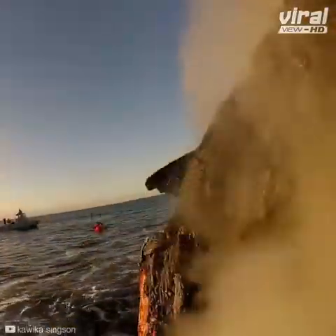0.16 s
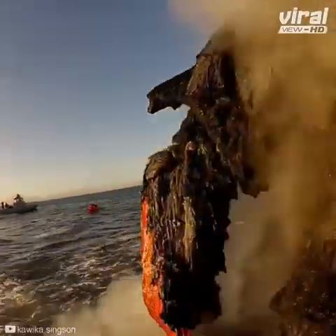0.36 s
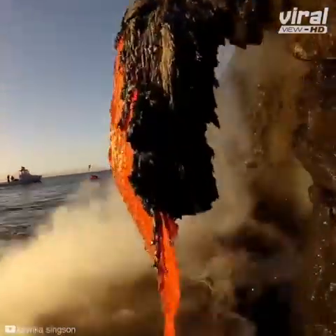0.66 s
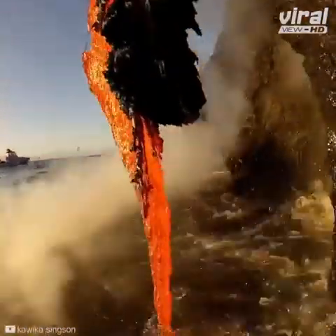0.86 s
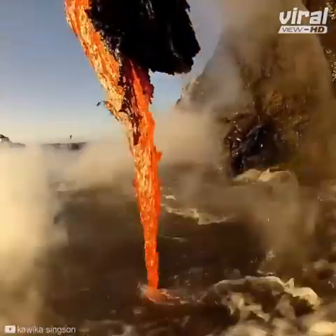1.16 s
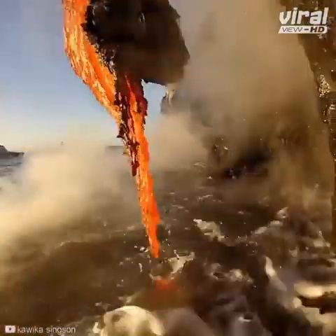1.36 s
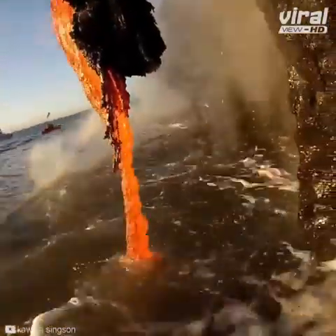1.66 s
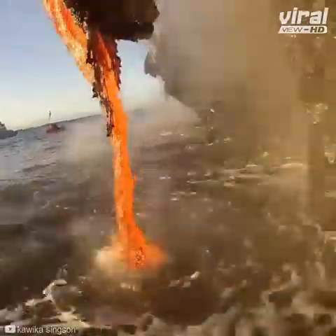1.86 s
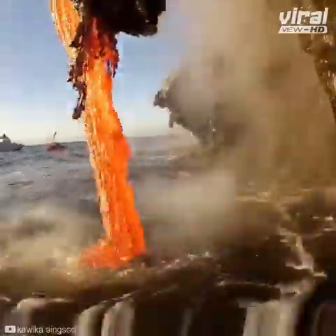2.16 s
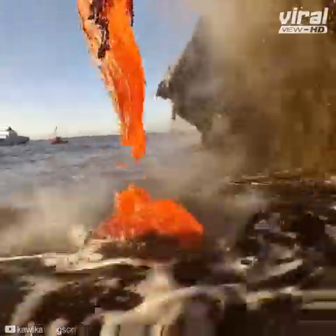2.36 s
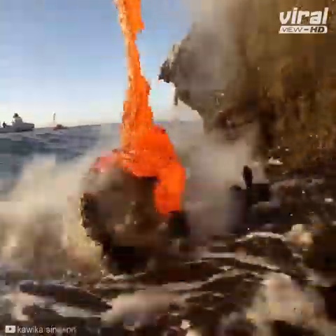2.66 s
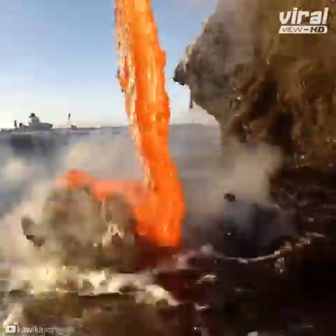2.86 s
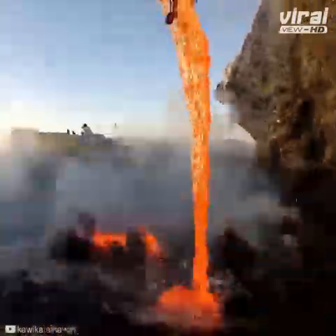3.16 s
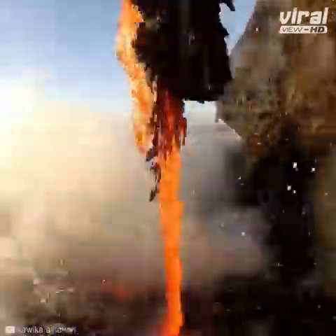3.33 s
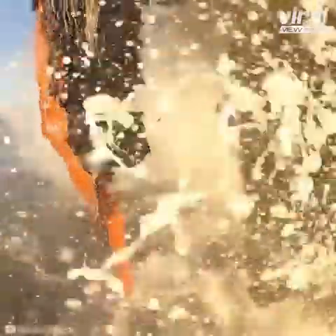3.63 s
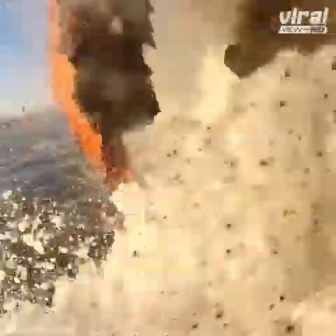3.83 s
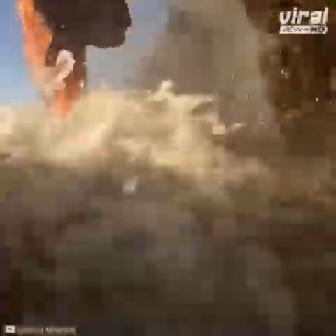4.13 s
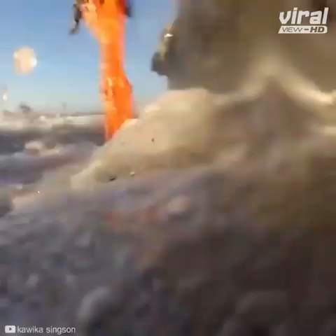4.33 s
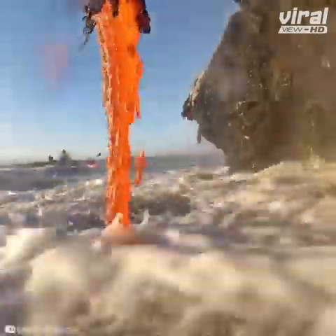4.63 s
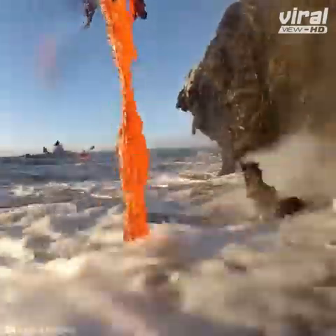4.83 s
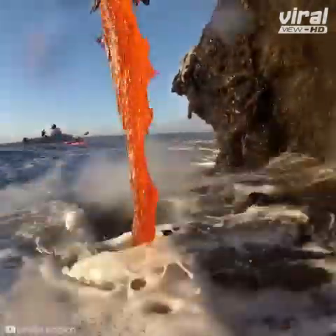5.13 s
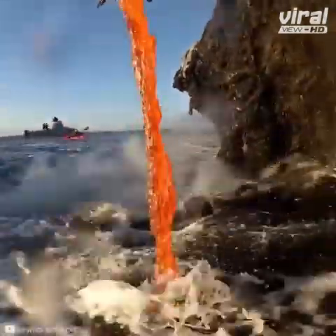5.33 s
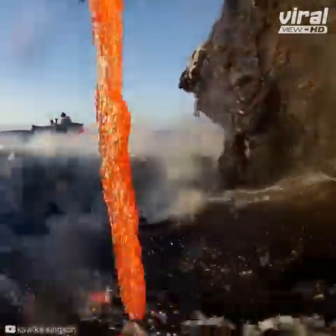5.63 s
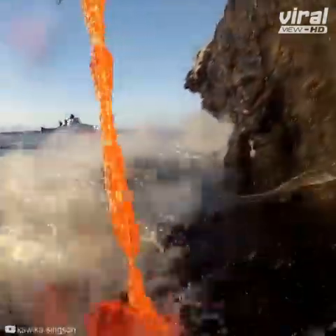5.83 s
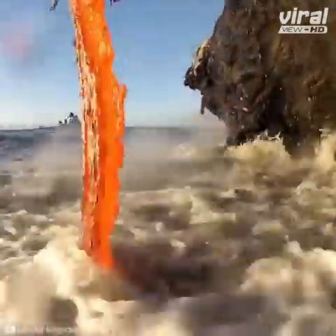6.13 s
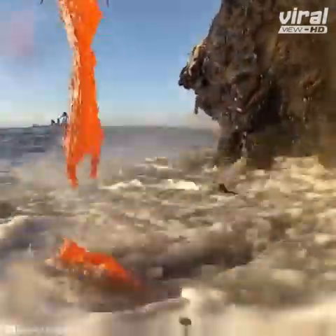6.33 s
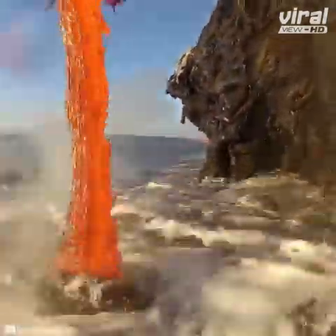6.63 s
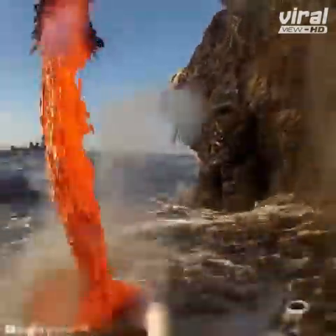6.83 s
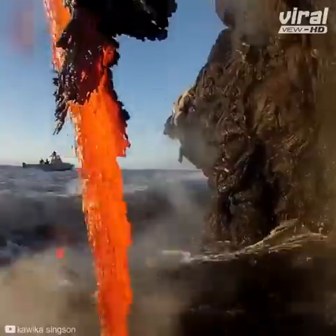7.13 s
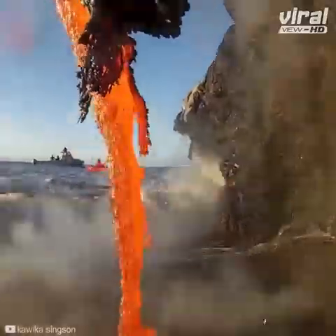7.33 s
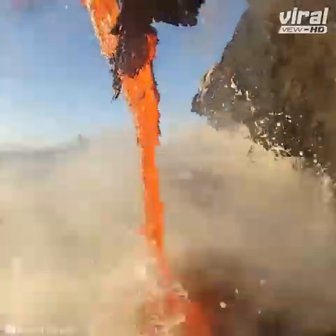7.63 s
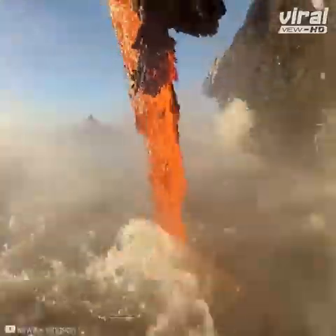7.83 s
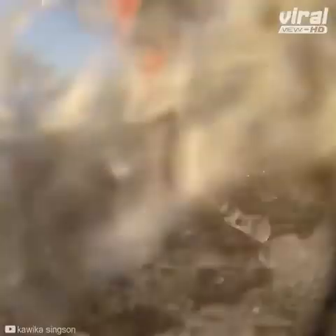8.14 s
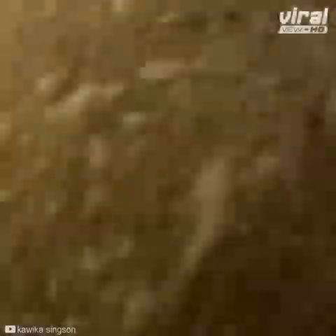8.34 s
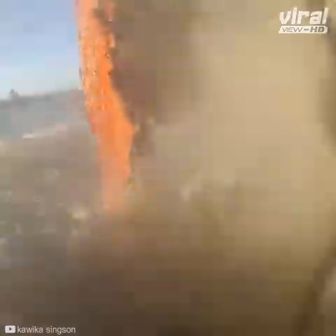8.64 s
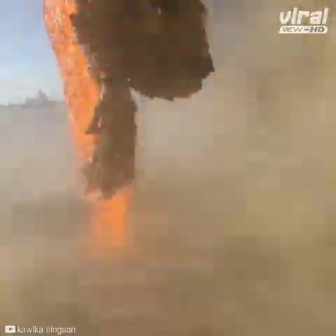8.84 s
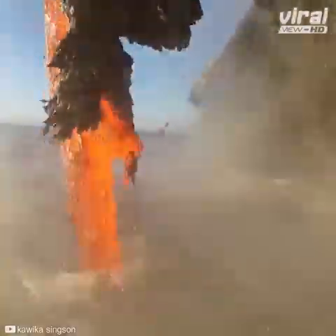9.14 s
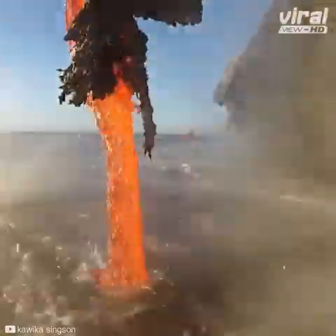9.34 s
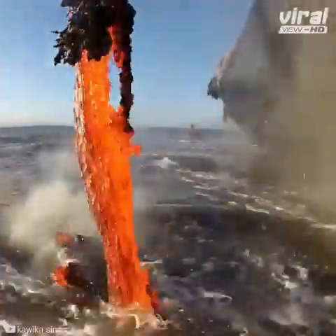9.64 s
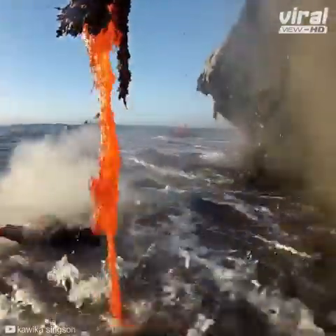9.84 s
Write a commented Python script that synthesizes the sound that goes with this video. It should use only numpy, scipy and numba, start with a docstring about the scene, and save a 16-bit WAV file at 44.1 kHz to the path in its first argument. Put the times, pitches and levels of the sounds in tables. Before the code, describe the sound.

Outdoors in surf beside pouring lava, heard by one close microphone sealed in a plastic shell on a pole, identical in both channels. A faint, dull hiss of surf and steam with fine foam crackle lies over a low, lumpy water rumble. Soft thumps come at 0.2 s, then hollow knocks, cracks and splashes at 1.0 to 1.4 s. From 1.5 to 3.5 s it is mostly quiet hiss, with a light tick near 2. At 3.6 s the hiss surges and spray snaps on the shell until 4.2; around 4.5 to 4.7 a wave swamps it with a short, dull drone. Deep thuds follow at 5.0, then at 6.2. Blows and splashes crowd 6.5 to 7.0 and 7.7 to 7.9. The loudest cracks come at 8.3 to 8.7, with bubbling, droning water and pole shudder, then hiss swells again, with a faint thump near 9.35.

```python
"""Surf and steam hiss where lava pours into the sea, heard dully through a camera's sealed shell on a pole.
The hiss is shaped noise with foam clicks in it, and low noise makes the rumble of water heaving on the pole.
Splashes and cracks are random droplets and short bursts that ring the shell; fading low tones are blows
of water on housing and pole. Twice a wave buries the camera: droning noise, bubbles and a shaken pole.
One microphone, so both channels are alike."""
import sys
import numpy as np
from scipy import signal
from scipy.fft import rfft, irfft
from scipy.io import wavfile
from scipy.ndimage import uniform_filter1d
from numba import njit

SR = 44100
rng = np.random.default_rng(int(sys.argv[2]) if len(sys.argv) > 2 else 0)


def bounce(signal):
    """Save signal as a 16-bit WAV file at the path given by the first command-line argument."""
    frames = np.transpose(np.atleast_2d(signal))
    limited = np.clip(frames, -1, 1)
    pcm = np.round(limited * 32767).astype(np.int16)
    wavfile.write(sys.argv[1], SR, pcm)


N = 440559  # length of the sound [samples]


def gain_of(db):
    """Turns decibels into a factor for the wave's height."""
    return 10 ** (np.asarray(db) / 20)


def evened(x):
    """Scales a sound to an average strength (rms) of 1."""
    return x / np.sqrt(np.mean(x ** 2) + 1e-20)


def read_curve(points, hz):
    """Reads a curve of (frequency, value) points, with pitch spaced as we hear it."""
    point_hz, value = np.transpose(points)
    return np.interp(np.log(hz + 1), np.log(point_hz + 1), value)


def add(mix, s, sound):
    """Adds a sound to the mix from time s on, cut off at the end of the mix."""
    part = mix[round(s * SR):][:len(sound)]
    part += sound[:len(part)]


def columns(rows):
    """Draws straight lines between timed rows: each column's value at every sample of their span."""
    s, *values = np.transpose(rows)
    t = np.arange(s[0], s[-1], 1 / SR)
    return [np.interp(t, s, v) for v in values]


@njit
def smooth(x, r):
    """Softens quick changes (a one-pole low-pass); r, the memory of the last value, may move."""
    y = x * (1 - r)
    for n in range(1, len(x)):
        y[n] += r[n] * y[n - 1]
    return y


def resonate(x, hz, width):
    """A resonance of gain 1: shifts the pitch hz down to zero, smooths, and shifts back."""
    turn = np.exp(2j * np.pi * np.cumsum(hz * np.ones(len(x))) / SR)
    r = np.exp(-np.pi * np.abs(width) / SR) * np.ones(len(x))
    shifted = x / turn + 1e-18
    return 2 * (turn * smooth(shifted, r)).real


def bands(x, spectrum):
    """Colours x and splits it into body, middle, fizz and top treble, each of rms 1."""
    hz = np.fft.rfftfreq(len(x), 1 / SR)
    z = rfft(x) * gain_of(read_curve(spectrum, hz))
    below_edges = [1 / (1 + (hz / edge_hz) ** 14) for edge_hz in (1300, 3400, 9300)]
    under = [0 * hz] + below_edges + [1 + 0 * hz]
    return [evened(irfft(z * share, len(x))) for share in np.diff(under, axis=0)]


def high_part(x, edge_hz):
    """Keeps what lies above edge_hz, without delay."""
    hz = np.fft.rfftfreq(len(x), 1 / SR)
    return irfft(rfft(x) / (1 + (edge_hz / (hz + 1)) ** 8), len(x))


def patchy_noise(patch_db, flicker_db, size):
    """White noise whose short-time spectra have drifting patches and a flicker shared by all pitches."""
    frames, bins = N * 4 // size + 5, size // 2 + 1
    a, b, patches = rng.standard_normal((frames, bins, 3)).T
    patches = uniform_filter1d(patches, size=8, axis=0)  # over pitch
    patches = evened(uniform_filter1d(patches, size=24, axis=1))  # over time
    flicker = evened(uniform_filter1d(rng.standard_normal(frames), size=10))
    z = (a + 1j * b) * gain_of(patch_db * patches + flicker_db * flicker)
    return evened(signal.istft(z, nperseg=size, noverlap=size * 3 // 4)[1][:N])


# Surf and steam: (time [s], hiss level [dB], low-mid body over the hiss [dB])
SURF_LEVELS = [(0.0, -50.5, -2), (0.56, -47.5, -5.5), (1.0, -39, -8), (1.22, -43.5, -6),
               (1.61, -48.5, -7.5), (3.08, -44, -8), (3.7, -33.5, -3.5), (4.17, -44.5, -6), (4.62, -39, -2),
               (4.78, -47.5, -5.5), (5.31, -48, -2.5), (6.09, -39, -8), (6.31, -43.5, -7.5),
               (7.48, -44, -3.5), (7.96, -38, -5.5), (8.29, -40, 1), (8.54, -39.5, -9), (8.76, -48.5, -1),
               (9.07, -48.5, -9), (9.35, -47.5, -4), (9.65, -44, -8), (9.99, -42, -7)]
# Colour of the hiss through the shell: (frequency [Hz], relative level per Hz [dB])
HISS_COLOUR = [(180, -0.5), (300, 10), (671, 3.5), (848, -6), (1040, -5.5), (1600, -10), (2100, -2.5),
               (5190, -14.5), (6140, -29), (6780, -20), (9330, -40.5), (11400, -57.5), (14700, -51.5),
               (15700, -55), (16500, -49)]
# Air trapped in the shell lifts or dents the hiss in narrow bands: (centre [Hz], width [Hz], lift [dB])
TRAPPED_AIR = [(678, 42, 4.5), (988, 264, 14), (1470, 22, 5), (1900, 280, 7.5), (1937, 140, -4),
               (2490, 68, 4.5), (5020, 370, 1.5), (6680, 780, 4), (9500, 94, 8.5), (5350, 270, 4),
               (12000, 810, -14), (14300, 1200, 3.5)]
FIZZ_DB, TOP_DB = -10.5, -8  # treble over the hiss
MUFFLE_DB, BURIED_DULL_DB = 1, 3.5  # under water: drop of the whole surf, further loss of its treble
# The hiss dips briefly after a loud splash: dB per dB of splash over DUCK_DB, deepest after DUCK_S [s]
DIP_PER_DB, DUCK_DB, DUCK_S = 0.55, -19, 0.023


def sea():
    """Hiss of surf and steam with bursting foam in it, muffled while water covers the camera."""
    foam_sizes = gain_of(2.7 * np.minimum(rng.exponential(1, N), 5))
    foam = foam_sizes * (rng.random(N) < 2500 / SR) * rng.choice([-1, 1], N)  # about 2500 clicks a second
    noise = patchy_noise(patch_db=1.5, flicker_db=1.23, size=512) + 0.28 * evened(foam)
    hz = np.fft.rfftfreq(N, 1 / SR)
    lift_db = sum(db / (1 + (2 * (hz - f) / width) ** 2) for f, width, db in TRAPPED_AIR)
    body, middle, fizz, top = bands(irfft(rfft(noise) * gain_of(lift_db), N), HISS_COLOUR)
    hiss_db, body_db = (np.resize(c, N) for c in columns(SURF_LEVELS))
    t = np.arange(SR // 4) / SR
    dip = (t / DUCK_S) * np.exp(1 - t / DUCK_S)
    for s, _, fall, splash_db, *_ in SPLASHES:
        add(hiss_db, s + fall / 2, -DIP_PER_DB * max(splash_db - DUCK_DB, 0) * dip)
    under = np.zeros(N)  # 0 in the air, 1 under water
    for rows in BURIALS:
        add(under, rows[0][0], signal.windows.tukey(len(columns(rows)[0]), .2))
    treble = gain_of(FIZZ_DB) * fizz + gain_of(TOP_DB) * top
    treble = gain_of(-BURIED_DULL_DB * under) * treble
    return gain_of(hiss_db - MUFFLE_DB * under) * (middle + treble + gain_of(body_db) * body)


# Water heaving against the pole: (time [s], level [dB])
HEAVE_LEVELS = [(0.0, -42), (0.56, -45.5), (3.17, -46), (3.62, -39), (4.14, -42), (4.37, -48), (4.54, -40),
                (5.39, -45), (6.17, -45), (6.62, -42), (6.9, -41), (7.04, -38), (7.2, -45), (8.12, -38),
                (8.54, -43), (8.76, -49.5), (9.29, -41.5), (9.99, -49)]
# Colour of the rumble: (frequency [Hz], relative level per Hz [dB])
RUMBLE_COLOUR = [(8.8, -36), (15, -6), (47, -2), (135, -13.5), (204, -9.5), (247, -19.5), (286, -21.5),
                 (419, -31), (500, -41), (650, -62), (1100, -120)]


def heave():
    """Lumpy rumble carried up the pole: low noise that rises and falls."""
    noise = patchy_noise(patch_db=1.0, flicker_db=0.5, size=1024)
    colour_db = read_curve(RUMBLE_COLOUR, np.fft.rfftfreq(N, 1 / SR))
    rumble = irfft(rfft(noise) * gain_of(colour_db), N)
    return gain_of(np.resize(columns(HEAVE_LEVELS)[0], N)) * evened(rumble)


# Ringing pitches (modes) of the plastic shell: (pitch [Hz], width [Hz], level [dB])
SHELL_MODES = [(624, 66, -11), (945, 233, -3), (1571, 250, -3.5), (2073, 430, -0.5), (2660, 560, -5.5)]


def ring_shell(x, near_hz=1500., fall_db=0.):
    """The short rings of the plastic shell; modes above near_hz lose fall_db per octave."""
    out = 0
    for k, (hz, width, db) in enumerate(SHELL_MODES):
        lost_db = fall_db * max(np.log2(hz / near_hz), 0)
        out = out + (-1) ** k * gain_of(db - lost_db) * resonate(x, hz, width)
    return out


# Splashes on the shell: (peak time [s], rise [s], fall [s], peak level [dB], fade over the fall [dB],
# body, fizz and top treble over the peak [dB, dB, dB], share of a trapped air pocket [0-1], its pitch [Hz])
SPLASHES = [(0.095, 0.18, 0.029, -40.5, 14, 8.5, -26, -12.5, 0.64, 960),
            (0.236, 0.014, 0.087, -44.5, 31, 12, -25, -8, 0.48, 890),
            (1.038, 0.014, 0.023, -25, 12, 6.5, -7.5, -10, .52, 778),
            (1.058, .006, 0.029, -33.5, 11, -2, -25, -11, .6, 1630),
            (1.161, 0.004, 0.039, -32.5, 12, -1, -14, -10, 0.23, 800),
            (1.418, 0.013, 0.068, -26.5, 28, 4.5, -25, -8.5, 0.11, 613),
            (3.624, 0.004, 0.052, -20, 9, -7.5, -11.5, -17, 0.19, 1940),
            (3.693, 0.0081, .046, -32, 12, 2, -12, -7.5, 0.22, 1200),
            (3.8, .004, 0.055, -42, 6.7, -2, -4, -9, .5, 1710),
            (3.865, 0.017, 0.019, -18.5, 27, -6.5, -6, -14, 0.083, 1760),
            (4.084, 0.014, 0.047, -30, 2.1, -0.5, -1, -16, 0.22, 1740),
            (4.338, 0.015, .08, -36.5, 21, 6.5, -10, -11, 0.48, 1055),
            (4.469, 0.0094, .04, -19.5, 17, -3.5, -12.5, -16, 0.91, 1680),
            (4.535, 0.061, 0.073, -34, 24, 2, -0.5, -8, .3, 1210),
            (4.735, 0.033, 0.027, -39.5, 8, -8, -16, -13, 0.31, 2200),
            (5.022, 0.0057, 0.0094, -27.5, 8, -1, -26, -10.5, 0.8, 1690),
            (5.045, 0.022, 0.06, -28, 28, -0.5, -16.5, -11, 0.89, 1770),
            (6.183, .008, 0.025, -36.5, 30, 7.5, -9, -6, 0.26, 1460),
            (6.222, 0.01, 0.04, -34, 7.2, 4, -11, -9, 0.17, 845),
            (6.53, .004, 0.044, -38.5, 12, -0.5, -7, -11, 0.22, 1200),
            (6.682, 0.0097, 0.089, -33.5, 32, 0.5, -39, -14, 0.31, 1150),
            (6.778, 0.0054, 0.032, -31, 22, 2.5, -37, -17, 0.36, 960),
            (6.816, 0.013, 0.059, -29.5, 11, 7.5, -36, -11, 0.13, 910),
            (6.97, 0.01, .028, -21.5, 18, 3, -31, -12.5, 0.24, 1100),
            (7.036, 0.037, 0.013, -29.5, 22, 4, -17, -4.5, 0.34, 1250),
            (7.747, 0.059, 0.012, -28.5, 24, 4, -38, -13, 0.36, 690),
            (7.843, 0.0053, 0.021, -28.5, 42, -1, -3.5, -9, 0.5, 1750),
            (7.906, 0.0097, .024, -38, 8.8, 8.5, -8, -7, 0.37, 723),
            (8.27, 0.012, 0.032, -27, 15, -10, -14, -20, 0.92, 2110),
            (8.32, 0.016, 0.03, -19, 17, -2, -7, -11, 0.16, 1420),
            (8.384, 0.0056, 0.019, -32, 14, -10, -17, -13, 0.45, 1700),
            (8.424, 0.02, 0.025, -29, 6.1, 6.5, -5, -10, 0.47, 1035),
            (8.472, 0.028, 0.026, -24.5, 5, 7, -7, -9.5, 0.21, 1084),
            (8.506, 0.0098, 0.025, -23.5, 9.2, -7, -13, -11.5, 0.55, 1260),
            (8.542, 0.015, 0.091, -30.5, 10, 5.5, -34, -9, 0.27, 850),
            (8.666, 0.033, 0.032, -28, 5.5, -1, -22, -10, 0.35, 1010),
            (8.714, 0.044, 0.067, -28, 25, 2, -9, -11.5, 0.14, 1090)]
# Colour of the spray: (frequency [Hz], relative level per Hz [dB])
SPRAY_COLOUR = [(180, 3), (300, -10), (682, -3), (954, -4), (1110, -6), (1800, 6.5), (3240, -7.5),
                (3970, -16), (5460, -22.5), (6030, -36), (6670, -24.5), (9180, -20), (11800, -31),
                (14900, -26.5), (16500, -81)]
RISE_DB = 16.5  # climb over a splash's full rise
BODY_LINGERS, FIZZ_LINGERS, TOP_LINGERS = 0.1, 0.16, 0.27  # share of the fade that each layer is spared
POCKET_GROWS = 0.05  # added to the pocket's share by the end of a splash


def splashes():
    """Dense droplets of very unlike size ring the shell and the pocket of air that the splash traps."""
    drop_sizes = gain_of(3.8 * np.minimum(rng.exponential(1, N), 5))
    drops = drop_sizes * (rng.random(N) < 5000 / SR) * rng.standard_normal(N)  # about 5000 a second
    drops = evened(drops) + 1.27 * rng.standard_normal(N)
    layers = bands(drops + 3.9 * ring_shell(drops), SPRAY_COLOUR) + [drops]
    layers.append(high_part(layers[1], edge_hz=1520))
    out = np.zeros(N)
    for s, rise, fall, peak_db, fade_db, body_db, fizz_db, top_db, share, pocket_hz in SPLASHES:
        start = max(s - rise, 0)
        t = np.arange(start - s, fall, 1 / SR)  # zero at the peak
        late = np.maximum(t / fall, 0)
        faded_db = fade_db * late
        db = peak_db + RISE_DB * np.minimum(t / rise, 0) - faded_db
        body, middle, fizz, top, bare, upper = (b[round(start * SR):][:len(db)] for b in layers)
        middle = middle - upper * np.clip(-.035 * (fizz_db + 22.5), -.3, .8)  # little fizz: a dull splash
        pocket = resonate(bare, pocket_hz, 0.19 * pocket_hz)
        pocket = evened(resonate(pocket, pocket_hz, 0.11 * pocket_hz))
        share = np.clip(share + POCKET_GROWS * late, 0, 1)
        low = share / (1 + (pocket_hz / 1300) ** 8)  # the pocket takes its share from the band it lies in
        body = np.sqrt(1 - low) * body + np.sqrt(low) * pocket
        middle = np.sqrt(1 - share + low) * middle + np.sqrt(share - low) * pocket
        spray = middle + gain_of(body_db + BODY_LINGERS * faded_db) * body
        spray += gain_of(fizz_db + FIZZ_LINGERS * faded_db) * fizz
        spray += gain_of(top_db + TOP_LINGERS * faded_db) * top
        edges = signal.windows.tukey(len(db), min(0.0066 * SR / len(db), 1))
        add(out, start, edges * gain_of(db) * spray)
    return out


# Blows of water: (start [s], strength on the housing [dB], pole over the housing [dB],
# pole pitch as the grip sets it [Hz], time in which the pole's tone fades by 60 dB [s])
BLOWS = [(0.207, -32.5, 5, 57.4, 0.32), (0.246, -23, 7, 65, 0.11), (0.274, -24, 10, 64, 0.13),
         (1.036, -12.5, 0.5, 127, 0.079), (1.162, -15, 9.5, 129, 0.067), (1.414, -3, -4.5, 138.7, 0.15),
         (1.433, -7.5, -10, 116, 0.18), (1.812, -53, 18.5, 51.1, 0.12), (2.073, -41.5, -18, 136, 0.12),
         (2.688, -31.5, 5.5, 48.7, 0.34), (3.631, -20.5, -8, 121, 0.23), (3.691, -27.5, 13, 118, 0.1),
         (3.756, -30, -7, 110, 0.2), (3.861, -35, 2, 123, 0.2), (4.091, -27.5, 3, 70.5, 0.14),
         (4.332, -38.5, 7, 51.1, 0.2), (4.435, -38, -8, 135, 0.15), (4.477, -29, 2, 104, 0.22),
         (4.559, -22, -11, 132, 0.15), (5.021, -13, 10, 92.2, 0.27), (5.046, -16.5, 17, 89.8, 0.18),
         (5.801, -35.5, 7, 56, 0.17), (6.178, -31.5, 9.5, 64.4, 0.099), (6.221, -13.5, -3.5, 120.5, 0.12),
         (6.532, -17.5, -1.5, 113, 0.18), (6.683, -16, -5, 121.7, 0.48), (6.778, -22, 7.5, 110.5, 0.33),
         (6.813, -5, -18, 135, 0.29), (6.828, -13, 14.5, 99.7, 0.13), (6.857, -10, 9.5, 124, 0.076),
         (6.969, -6.5, -27, 105, 0.12), (7.006, -11, 2, 90, 0.13), (7.031, -15, -11, 121, 0.18),
         (7.419, -37.5, 3, 137, 0.2), (7.498, -36, -16, 134, 0.2), (7.548, -36, -1, 64.6, 0.2),
         (7.708, -6, -7, 136, 0.2), (7.74, -30, 19, 53.5, 0.13), (7.902, -28, 8.5, 129, 0.095),
         (8.26, -33, -9, 103, 0.2), (8.319, -20.5, -20, 56, 0.14), (8.364, -34, -9, 70.0, 0.2),
         (8.6, -13, -2, 123, 0.2), (8.664, -21, -1, 133, 0.2), (9.348, -38, 5, 50.7, 0.15)]
# Ringing pitches of the housing: (pitch [Hz], level [dB], time to fade by 60 dB [s])
HOUSING_MODES = [(61.4, -2, 0.086), (127.3, -8.5, 0.17), (200.6, 9, 0.08), (304, -5.5, 0.046),
                 (436, -12, 0.049), (544, -17, 0.074), (760, -20.5, 0.083)]


def blows():
    """Each blow, a few milliseconds long, starts the housing modes and the sway of the pole."""
    t, out = np.arange(SR // 3) / SR, np.zeros(N)
    housing = sum(gain_of(db - 60 * t / t60) * np.sin(2 * np.pi * hz * t) for hz, db, t60 in HOUSING_MODES)
    soft_start = 1 - np.exp(-t / 0.0044)
    for s, db, pole_db, pole_hz, pole_t60 in BLOWS:
        pole = gain_of(pole_db - 60 * t / pole_t60) * np.sin(2 * np.pi * pole_hz * t)
        add(out, s, -gain_of(db) * (housing + pole) * soft_start)
    return out


# Single drops and chips cracking on the shell: (start [s], peak level of the ring [dB],
# push, fizz and top treble over that peak [dB, dB, dB], pitch [Hz])
CRACKS = [(0.237, -33, -8, -33, -27, 969), (1.035, -10.5, -1, -30, -27, 840),
          (1.049, -7.5, -1.5, -24, -26, 703), (1.161, -13.5, 5.5, -39, -26, 680),
          (1.416, -12.5, -12, -31, -18, 696), (2.075, -27.5, 7, -25, -18, 885),
          (3.624, -27, -3, -17, -24, 2340), (3.662, -13, -19, -3, -16, 1460),
          (3.694, -10.5, -7, -23, -26, 1080), (3.804, -16.5, -7, -20, -27, 2170),
          (3.836, -24, 2, -17, -22, 2570), (3.885, -37, -8, -27, -32, 1960),
          (4.081, -26, -15, -7, -18, 1760), (4.096, -14, 1, 6.5, -26, 1860),
          (4.196, -30, -10, 1, -20, 2000), (4.44, -23.5, 8.5, -5, -25, 1750),
          (4.509, -12.5, -9, -26, -24, 2010), (4.532, -19, 2, -9, -24, 1270),
          (4.56, -13, -12, -24, -25, 1020), (4.848, -38, -11, 9.5, -16, 1850),
          (4.853, -26, -16, -9, -21, 2360), (5.019, -31, 1, -34, -25, 1800),
          (5.151, -27, -4, -9, -12, 2440), (5.221, -30.5, -3, -8, -24, 915),
          (5.255, -24.5, -11, -23, -19, 1090), (6.183, -15.5, -10, -26, -26, 1660),
          (6.22, -15, -26, -26, -26, 695), (6.529, -27, -6, -25, -27, 1080),
          (6.682, -19, -16, -28, -23, 1010), (6.815, -21, -9, -33, -26, 755),
          (6.856, -20, 0, -30, -18, 713), (6.968, -12, 1.5, -33, -19, 980),
          (6.977, -10.5, 6.5, -33, -19, 1100), (7.032, -6, 2, -21, -24, 1500),
          (7.501, -26.5, 8, -28, -5, 1070), (7.712, -8, -23, -34, -20, 670),
          (7.843, -10.5, -9.5, -11, -27, 2420), (7.904, -16, -4, -21, -26, 703),
          (8.267, -28, 9, -20, -23, 2060), (8.318, 0, -11.5, -11.5, -22, 1840),
          (8.334, -3.5, -3, -3, -20, 1850), (8.424, -19, -6, -15, -21, 960),
          (8.428, -14, -21, -9, -21, 1090), (8.471, 0.5, -11, -13, -21, 1540),
          (8.503, -7.5, -12, -32, -26, 1800), (8.537, -24, -6, -28, -21, 1040),
          (8.545, -14, -4, -21, -22, 1070), (8.598, -35, -8, -44, -24, 818),
          (8.639, -17.5, -11, -8, -6, 738), (8.666, -6, -4, -38, -26, 2280)]


def cracks():
    """A millisecond burst rings the shell, most near its own pitch, with a bare tick and a one-cycle push."""
    t, out = np.arange(3000) / SR, np.zeros(N)
    bursts = rng.standard_normal((len(CRACKS), len(t))) * gain_of(-60 * t / 0.0062)
    push = (t / 0.00075 - 1) * np.exp(-t / 0.00083) * (1 - np.exp(-t / 0.00046)) * 3.56
    for (s, db, push_db, fizz_db, top_db, hz), burst in zip(CRACKS, bursts):
        ring = 1.15 * ring_shell(burst, hz, fall_db=7.5) + resonate(burst, hz, 214)
        fizz, top = (tick * (t < .02) / abs(tick).max() for tick in bands(burst, SPRAY_COLOUR)[2:])
        ticks = gain_of(fizz_db) * fizz + gain_of(top_db) * top
        add(out, s, gain_of(db) * (ring / abs(ring).max() + gain_of(push_db) * push + ticks))
    return out


def bubbles(per_s, low_hz, high_hz):
    """Bubbles of random size, each a few swelling cycles that glide upward."""
    out, t = np.zeros(N), np.arange(1500) / SR
    for hz in np.geomspace(low_hz, high_hz, num=16):
        swell = (t * hz) * np.exp(-t * hz / 0.9)
        shape = swell * np.sin(2 * np.pi * hz * t * (1 + 0.018 * hz * t))
        sizes = gain_of(1.5 * np.minimum(rng.exponential(1, N), 4))
        starts = sizes * (rng.random(N) < per_s / 16 / SR)
        out += signal.oaconvolve(starts, shape)[:N]
    return out


# One list for each wave over the camera: (time [s], housing drone level [dB], its pitch [Hz],
# bubbles over the drone [dB], pole sway level [dB])
BURIALS = [
    [(4.49, -44, 196, -23, -37), (4.518, -18.5, 191, -16, -24), (4.558, -19, 186, -9, -13),
     (4.616, -31, 191, -23, -40), (4.7, -37, 200, -16, -59)],
    [(8.44, -25, 192, -10, -30), (8.494, -19.5, 238, 6, -21), (8.558, -12, 254, -17.5, -29),
     (8.6, -20, 222, 9, -8.5), (8.622, -24, 223, -2, -18.5), (8.68, -16.5, 208, 0, -23),
     (8.76, -50, 209, 2, -54)],
]


def burials():
    """Churning water keeps the housing droning, bubbles swell round it, and the pole is shaken."""
    out, churn = np.zeros(N), bubbles(per_s=260, low_hz=285.5, high_hz=725)
    for rows in BURIALS:
        db, hz, bubbles_db, sway_db = columns(rows)
        push, shake = rng.standard_normal((2, len(db)))
        drone = evened(resonate(resonate(push, hz, 137), hz, 48))
        gurgle = evened(churn[round(rows[0][0] * SR):][:len(db)])
        sway = evened(resonate(resonate(shake, 90, 90), 89, 104))
        water = gain_of(db) * (drone + gain_of(bubbles_db) * gurgle)
        edges = signal.windows.tukey(len(db), .1)
        add(out, rows[0][0], edges * (water + gain_of(sway_db) * sway))
    return out


def scene():
    """Adds up all the sources and sends the same sum to both channels."""
    mono = sea() + heave() + splashes() + blows() + cracks() + burials()
    return np.array([mono, mono])


EDGE_HZ = 15780  # upper limit of the sound


def record(dry):
    """Peaks round off in the input stage; then a steep filter removes what lies above EDGE_HZ."""
    rounded = 0.93 * np.tanh(dry / 1.032)
    low_pass = signal.firwin(2047, EDGE_HZ, window=("kaiser", 9), fs=SR)
    return signal.oaconvolve(rounded, low_pass[None], "same")


dry = scene()
out = record(dry)
bounce(out)
```